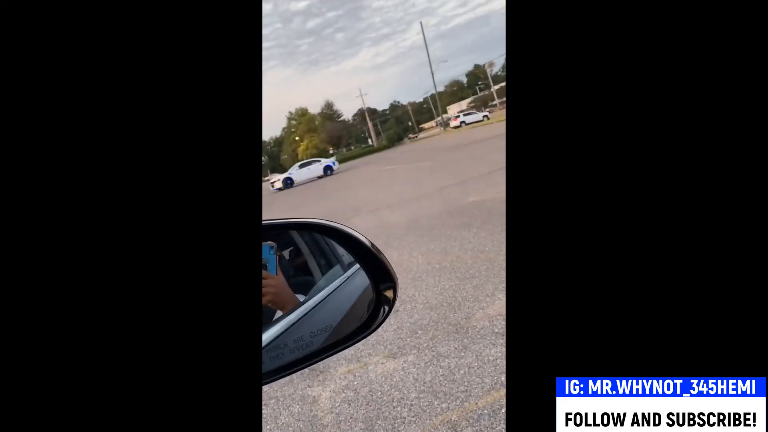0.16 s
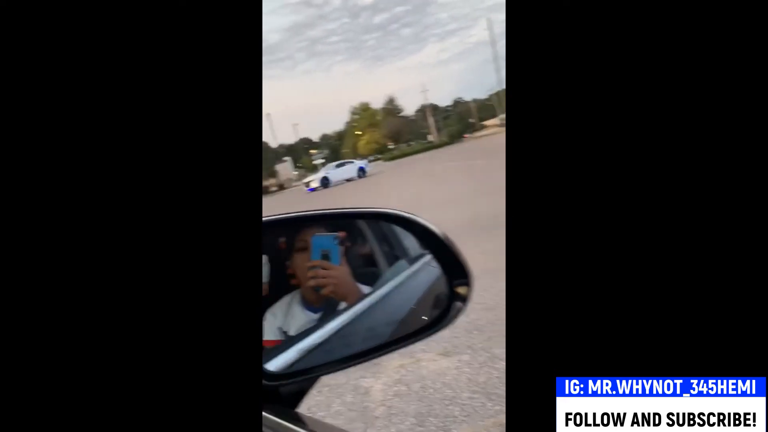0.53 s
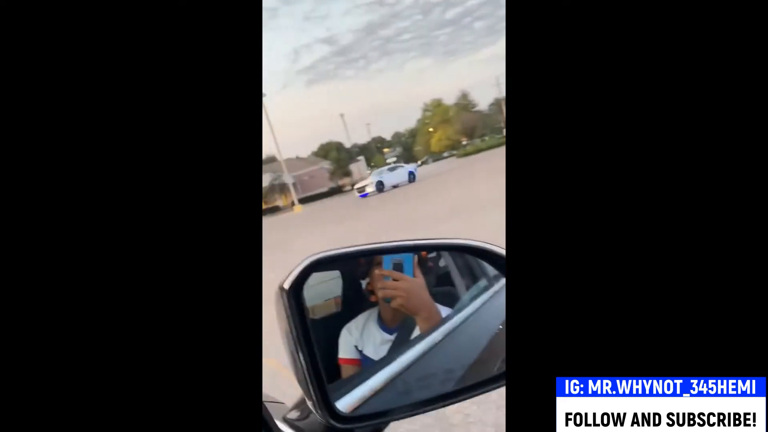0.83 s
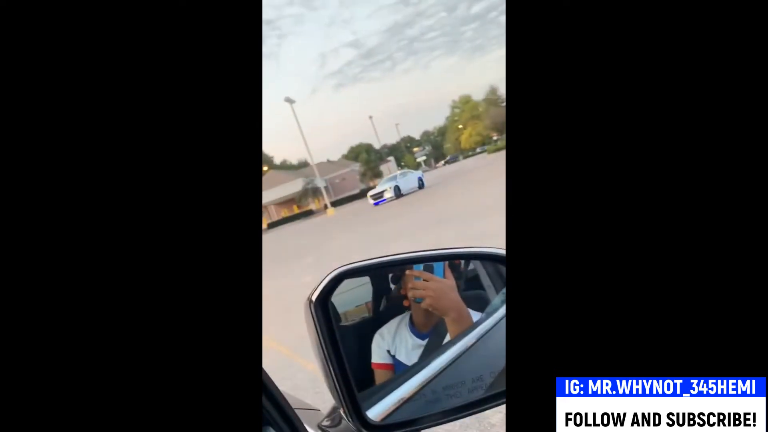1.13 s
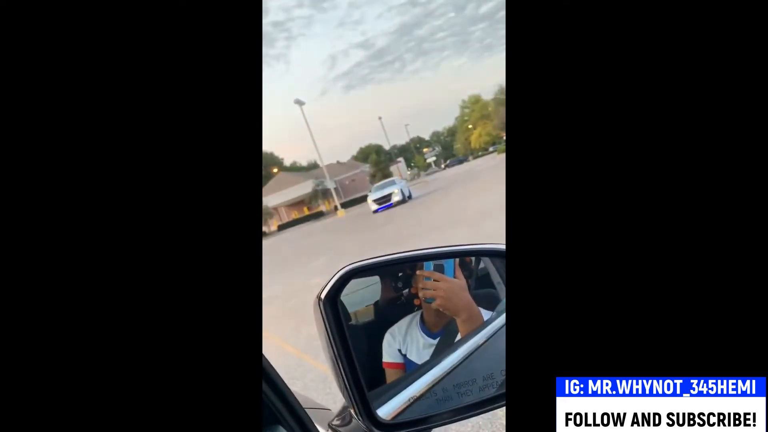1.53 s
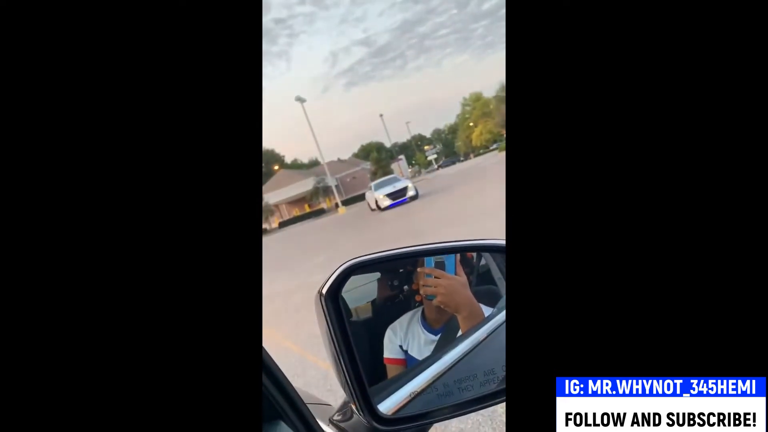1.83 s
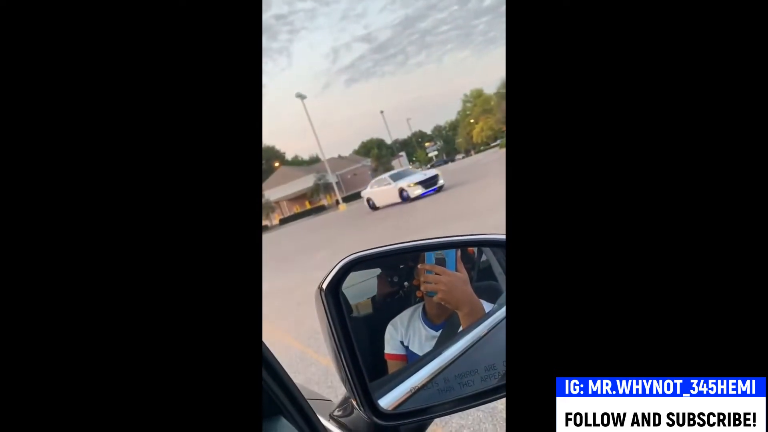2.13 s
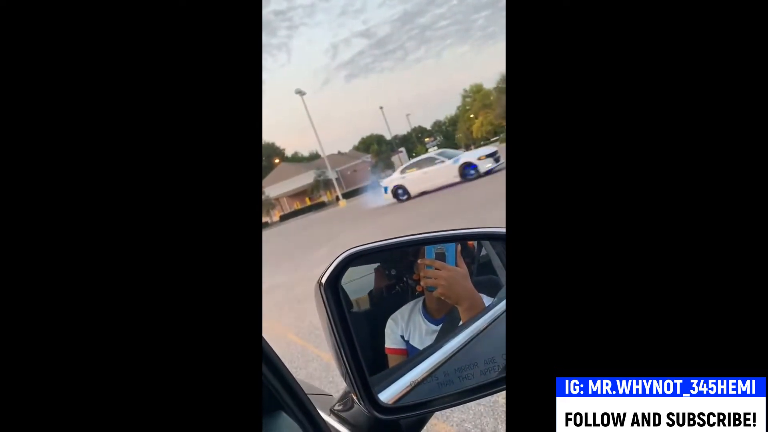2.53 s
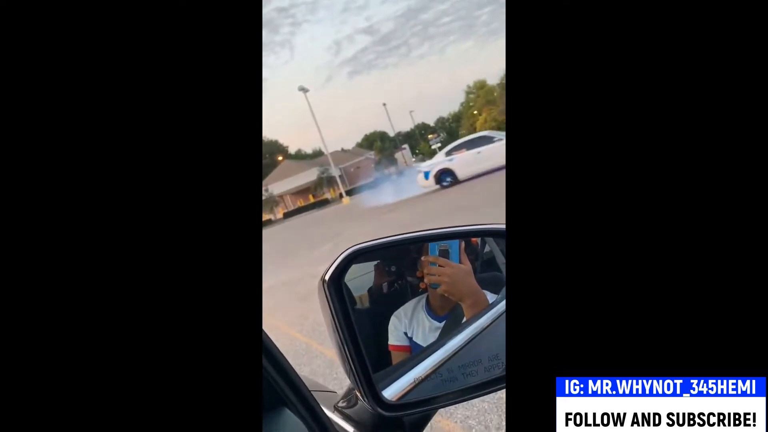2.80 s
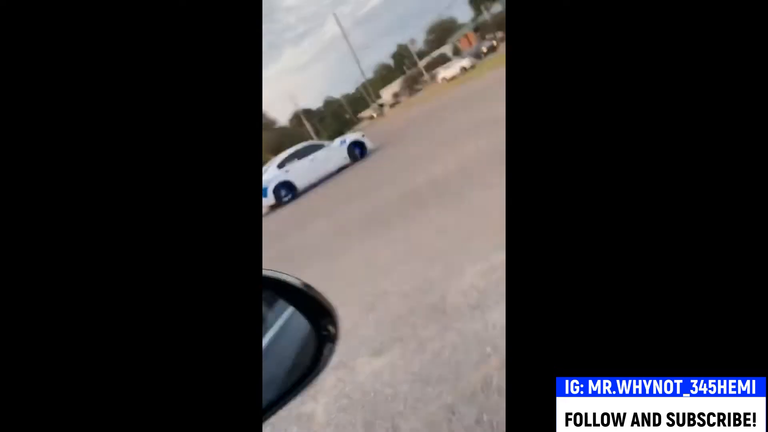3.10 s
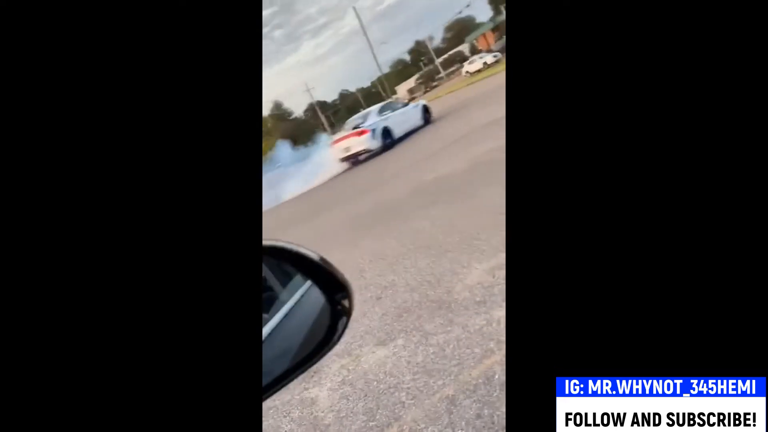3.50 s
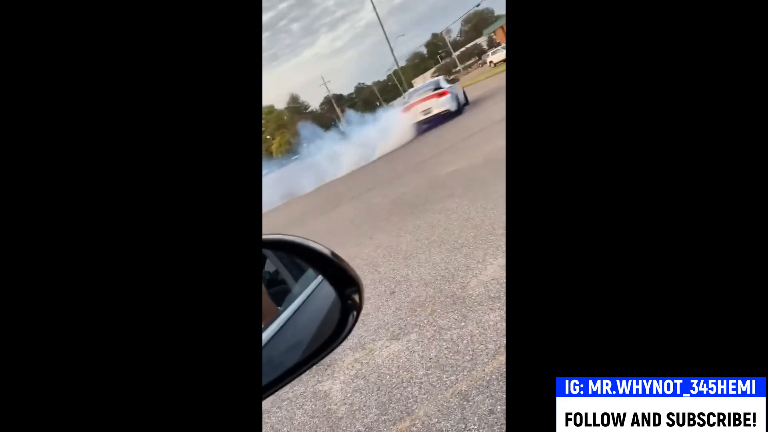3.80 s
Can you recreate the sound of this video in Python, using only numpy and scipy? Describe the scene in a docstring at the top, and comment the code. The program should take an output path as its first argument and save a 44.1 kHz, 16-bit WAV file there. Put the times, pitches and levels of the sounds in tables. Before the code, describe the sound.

A V8 car engine starts low and quiet, swells and winds up to a barking, raspy peak near 1.3 s, sags until 1.7, climbs again to 2.3, bogs by 2.65, then holds a booming, slightly rising roar as it swings close. Short hoarse tyre squeals come from 0.8 to 3.3 s; gritty tyre hiss grows late. Faint high whistle at 0.6, stone tick at 3.7, early low rumble, light open-lot echo.

```python
"""A V8 car spins donuts on an asphalt lot, heard from the window of a standing car.
The engine winds up, bogs twice as the tyres bite, then roughly holds its speed as the car swings close by.
Its lopsided firings make a booming stack of tones, plus bursts of gas noise that roar, bark and rasp.
The tyres squeal as wavering tones and hiss as gritty noise; a whistle, a stone tick and a rumble join in.
The lot answers exhaust and squeals with a fading tail and one far wall."""
import sys
import numpy as np
from scipy import signal
from scipy.fft import rfft, irfft, next_fast_len
from scipy.io import wavfile
from scipy.ndimage import uniform_filter1d, map_coordinates

SR = 44100
rng = np.random.default_rng(int(sys.argv[2]) if len(sys.argv) > 2 else 0)


def output_pcm(signal):
    """Save a mono or channel-first signal as 16-bit PCM at the path in sys.argv[1].

    Samples are clipped to [-1, 1] before scaling.
    """
    pcm = np.clip(np.atleast_2d(signal).T, -1, 1) * 32767
    wavfile.write(sys.argv[1], SR, np.round(pcm).astype(np.int16))


N = 174195  # length [samples]

# Engine speed: (time [s], full four-stroke cycles per second [Hz])
ENGINE_SPEED = [(0, 15.9), (.25, 17.75), (.5, 21.5), (.6, 23.4), (.75, 29.8), (1, 39.3), (1.25, 47.8),
                (1.31, 48.4), (1.42, 47.6), (1.5, 44.8), (1.56, 41.5), (1.62, 37.5), (1.68, 35.2),
                (1.75, 36.8), (1.87, 40.7), (2, 43), (2.25, 47.4), (2.35, 47.4), (2.44, 45.8), (2.5, 43.8),
                (2.57, 39), (2.64, 34.8), (2.75, 34.9), (3, 36), (3.25, 38.1), (3.5, 38), (3.75, 40.4),
                (3.95, 38)]
# Exhaust, before the trims below: (time [s], boom level [dB], bark level [dB], rasp level [dB])
EXHAUST_LEVELS = [(0.0, -35, -49, -49.5), (0.18, -22.5, -35, -39.5), (0.33, -19.5, -28.5, -34),
                  (0.48, -18.5, -22, -24.5), (0.54, -17.5, -20.5, -27.5), (0.58, -17, -19, -22),
                  (0.95, -17.5, -14.5, -16.5), (1.3, -21, -21.5, -19), (1.4, -26.5, -23, -21.5),
                  (1.46, -20.5, -25, -23), (1.56, -19, -18, -17.5), (1.73, -28.5, -26, -24.5),
                  (1.99, -24.5, -27.5, -24), (2.0, -26.5, -58, -27.5), (2.12, -23.5, -28, -24.5),
                  (2.17, -25.5, -28.5, -24.5), (2.38, -21, -20.5, -25.5), (2.44, -15, -19.5, -19),
                  (2.56, -15.5, -25, -19.5), (2.66, -20.5, -21, -23.5), (2.96, -18.5, -18, -17.5),
                  (3.0, -16.5, -17, -20), (3.37, -16, -18, -20.5), (3.73, -18, -20.5, -25.5),
                  (3.95, -23.5, -32, -29)]
# How much gas noise the exhaust carries: (time [s], share [0-1])
ROUGHNESS = [(0, 0.27), (.3, 0.33), (.55, 0.2), (.8, 0.19), (1.1, 0.15), (1.35, 0.26), (1.52, 0.47),
             (1.65, .08), (2.33, 0.18), (2.47, 0.26), (2.58, .14), (2.7, 0.07), (3.95, 0.03)]
# The firings of one cycle: (strength [dB], lag along its header pipe [s])
CYLINDERS = [(-4, 0.00035), (-3.5, 0.001107), (1, 0.001614), (-4, 0.00019), (-3, 0.000897), (1.5, 0.001184),
             (-4.5, 0.00015), (-0.5, 0.00138)]
# Engine orders, tones at whole multiples of the cycle, relative to the boom:
# (multiple [-], pulling away [dB], turning [dB], bogging [dB], passing [dB])
ENGINE_ORDERS = [(2, -16.5, -15.5, -20, -17), (3, -7, -10.5, -10.5, -9), (4, -16, -2, -14.5, -16),
                 (6, -18, -8, -8.5, -11), (7, -15, -15, -8.5, -20), (9, -12.5, -10.5, -13, -9),
                 (10, -13.5, -15, -17.5, -12.5), (11, -15, -12, -13.5, -26), (12, -13, -10.5, -15.5, -23),
                 (13, -21.5, -16, -19, -26), (14, -19.5, -21.5, -21, -15), (15, -19, -12, -14.5, -13.5),
                 (16, -20, -7.5, -19, -19), (17, -19, -18, -18, -9.5), (18, -13, -16, -14.5, -10),
                 (19, -24, -22, -11.5, -12.5), (20, -32, -30, -18, -16), (22, -25, -22, -17, -20),
                 (23, -16, -16, -25, -16)]
# When the order balance reaches each state in turn: time [s]
BALANCE_TIMES = [1.2, 1.42, 1.55, 1.83, 2.2, 2.48, 2.58, 2.75, 3.52, 3.95]
# Fifth order, the drone of the lopsided firing: (time [s], level [dB])
DRONE_LEVEL = [(0, -36), (.3, -29), (.45, -23), (.7, -20), (.85, -19.5), (1.05, -24), (1.25, -22),
               (1.42, -35), (1.52, -30), (1.63, -20.5), (1.75, -27), (1.87, -35), (2.2, -36), (2.35, -24),
               (2.5, -24), (2.65, -18.5), (2.8, -24.5), (3.1, -30), (3.5, -25), (3.95, -31)]
# Eighth order, the firing rate: (time [s], level [dB])
FIRING_TONE_LEVEL = [(0, -47), (.3, -33.5), (.68, -32), (.78, -19), (1, -21.5), (1.12, -29.5),
                     (1.35, -26.5), (1.48, -39), (1.57, -20), (1.68, -30), (1.78, -25.5), (1.95, -38.5),
                     (2.2, -37.5), (2.45, -37), (2.65, -28.5), (2.8, -29), (3.1, -20), (3.35, -21.5),
                     (3.55, -27), (3.7, -38), (3.95, -31)]
# Colours of the three exhaust noises, shape only: (frequency [Hz], gain [dB])
ROAR_COLOUR = [(35, -40), (70, -6), (130, -3), (280, -3), (380, -7), (520, -11), (900, -26), (1500, -74.5)]
BARK_COLOUR = [(250, -54.5), (400, -6.5), (520, -3), (690, 3), (830, 2.5), (980, -1), (1300, -19.5),
               (2500, -61.5)]
RASP_COLOUR = [(550, -38), (900, -2), (1100, 1.5), (1220, 2), (1400, 1.5), (1700, -4.5), (2100, -8),
               (2700, -27), (4500, -50)]
# Tyre squeals: (middle [s], length [s], pitch [Hz], level [dB])
TYRE_SQUEALS = [(0.787, 0.13, 1635, -23.5), (1.302, 0.3, 1454, -21), (1.56, .1, 1081, -20),
                (1.618, 0.27, 1409, -25.5), (2.053, 0.35, 1235, -27.5), (2.28, .2, 1128, -25),
                (2.55, 0.13, 1581, -18.5), (3.1, 0.57, 1100, -23), (3.28, 0.16, 689, -21)]
# Tyre noise, before the trims below: (time [s], scrub level [dB], hiss level [dB])
TYRE_LEVELS = [(0.0, -54, -64), (0.07, -61.5, -56.5), (0.16, -52.5, -66), (0.63, -37.5, -56),
               (0.68, -35, -50), (1.19, -33.5, -41), (1.46, -40.5, -51), (1.54, -30.5, -36),
               (1.73, -38, -51), (1.83, -37.5, -49), (2.09, -30, -41), (2.38, -36, -41), (2.5, -27, -32),
               (2.72, -33.5, -37), (3.17, -36.5, -39.5), (3.3, -31, -28.5), (3.5, -30.5, -26.5),
               (3.82, -27, -25.5), (3.95, -30, -22)]
# Colours of the tyre noises, shape only: (frequency [Hz], gain [dB])
SCRUB_COLOUR = [(1200, -5), (2200, 7.5), (2800, 3.5), (3500, 1.5), (4400, -12), (5500, -7), (8000, -31)]
HISS_COLOUR = [(2500, -16), (4200, 1), (5500, -0.5), (7000, -0.5), (8500, 1.5), (10000, -1.5), (11200, -6),
               (12000, -31)]
# Thin whistle: (time [s], level [dB])
WHISTLE_LEVEL = [(.28, -78), (.42, -56), (.6, -40.5), (.68, -53), (.76, -87)]
# Low rumble, before its trim: (time [s], level [dB])
RUMBLE_LEVEL = [(0.0, -28), (0.25, -36), (0.45, -30), (0.62, -23), (1.3, -35), (1.84, -33), (1.91, -28),
                (2.19, -36), (2.5, -40), (3.74, -45), (3.95, -40)]
# Colour of the rumble, shape only: (frequency [Hz], gain [dB])
RUMBLE_COLOUR = [(15, -30), (33, -25), (46, -1.5), (60, 0), (90, 2), (200, -72)]
# Echo of the lot: (frequency [Hz], time to fade by 60 dB [s])
LOT_FADE = [(100, 0.88), (1000, 0.55), (8000, 0.069)]
# Between the two microphone ports: (frequency [Hz], phase by which left leads [rad])
PORT_PHASE = [(1700, 0), (2200, 1.5), (3600, 1.57), (4100, 1.5), (4500, 3.5), (4900, 3.5), (5300, 3),
              (5800, 5), (6400, 6.5), (7400, 6.5), (9000, 9.5), (10600, 13)]
# Likeness of the ports, rising towards 1 in the bass: (frequency [Hz], likeness [0-1])
PORT_LIKENESS = [(100, 1), (350, 0.96), (700, .94), (1600, 1), (2100, 0.82), (3500, 0.82), (4500, 1),
                 (5300, 0.98), (5800, 0.63), (7000, 1), (7800, 0.17), (9000, 0.79), (9900, 0.71),
                 (11000, 0.49)]
# Left minus right, fading out in the bass: (frequency [Hz], difference [dB])
PORT_BALANCE = [(100, 0), (500, -1.4), (800, -2.5), (1400, 0), (1900, -1.5), (2400, 0.1)]

# Trims added to the levels [dB]
BOOM_DB, ROAR_DB, BARK_DB, RASP_DB = -0.5, -.5, -3.5, -1
SCRUB_DB, HISS_DB, RUMBLE_DB = 3, 2, -3
# Each firing: random strength [dB], random timing [s], fading time of its puff of gas [s]
SCATTER_DB, JITTER_S, PUFF_S = 2.5, .00008, 0.0027
WASH = .4  # steady gas noise between the firings, relative to the puffs
# The pipe lets the bass of each firing out late: delay [s], pitch below which it acts [Hz]
CHIRP_S, CHIRP_HZ = 0.004987, 697
# The pipe delays low orders more; high orders wander more [rad per order squared]
PIPE_SPREAD, PHASE_WANDER = 0.0402, 0.0016
SQUEAL_WAVER, SQUEAL_SMEAR = .025, 0.0499  # slow and fast unsteadiness [share of the pitch]
WHISTLE_HZ = 9980
TICK_S, TICK_DB, TICK_LIFE_S = 3.682, -5.5, 0.00099  # stone: time [s], level [dB], fading time [s]
LOT_DB, WALL_DB, WALL_S = -15, -22, .13  # tail level [dB], wall level [dB], wall delay [s]
TOP_HZ = 11750  # nothing is kept from here up


def amp(db):
    """Turn decibels into gain."""
    return 10 ** (np.asarray(db) / 20)


def unit(x):
    """Scale to rms 1."""
    return x / np.sqrt(np.mean(x ** 2) + 1e-20)


def steady(x):
    """Hold the running rms, taken over a sixth of a second, at 1."""
    return x / np.sqrt(np.abs(uniform_filter1d(x ** 2, size=SR // 6)) + 1e-12)


def along(points, hz):
    """Read (frequency, value) points on a log frequency axis."""
    f, v = np.transpose(points)
    return np.interp(np.log(hz + 1), np.log(f + 1), v)


def curves(rows):
    """Give one value per sample for each column after the time."""
    times, *columns = np.transpose(rows)
    return [np.interp(np.arange(N) / SR, times, column) for column in columns]


def wobble(rate):
    """Draw a smooth random curve with rate knots a second."""
    return map_coordinates(rng.standard_normal(1024), [np.arange(N) * rate / SR + 2], mode='wrap')


def filtered(x, response):
    """Multiply the spectrum of x by a response of frequency, which may be complex."""
    size = next_fast_len(N + SR // 2)
    spectrum = rfft(x, size) * response(np.fft.rfftfreq(size, 1 / SR))
    return irfft(spectrum, size)[..., :N]


def noise(colour):
    """Make coloured noise of rms 1."""
    return unit(filtered(rng.standard_normal(N), lambda hz: amp(along(colour, hz))))


def exhaust():
    """Boom, roar, bark and rasp all follow the same firings."""
    speed, = curves(ENGINE_SPEED)
    boom_db, bark_db, rasp_db = curves(EXHAUST_LEVELS)
    rough = np.clip(curves(ROUGHNESS)[0], 0, 1)
    cycles = np.cumsum(speed) / SR
    pulses = firings(cycles)
    clean = boom(cycles, boom_db, waver_db=0.7)
    roar = amp(ROAR_DB + boom_db) * np.sqrt(rough) * blast(pulses, ROAR_COLOUR, gas=1.0, wash=0.95)
    bark = amp(BARK_DB + bark_db) * blast(pulses, BARK_COLOUR, gas=.15 + rough, wash=WASH)
    rasp = amp(RASP_DB + rasp_db) * blast(pulses, RASP_COLOUR, gas=.2 + rough, wash=WASH)
    return clean + roar + bark + rasp


def firings(cycles):
    """Each cylinder firing is one pulse; strength and lag follow the firing order."""
    count = len(CYLINDERS)
    k = np.arange(1, int(cycles[-1] * count))
    strength_db, lag = np.array(CYLINDERS)[k % count].T
    chance = rng.standard_normal((2048, 2))[k]
    on_time = np.interp(k / count, cycles, np.arange(N))
    at = on_time + SR * (lag + JITTER_S * chance[:, 0])
    strength = amp(strength_db + SCATTER_DB * chance[:, 1])
    return np.bincount(np.abs(at).astype(int), strength, N)[:N]


def boom(cycles, boom_db, waver_db):
    """Clean engine orders: two leading tones over a stack whose balance shifts as the car turns."""
    t = np.arange(N) / SR
    pattern = np.fft.fft(amp(np.array(CYLINDERS)[:, 0]))
    levels = {5: curves(DRONE_LEVEL)[0], 8: curves(FIRING_TONE_LEVEL)[0]}
    for order, away, turning, bogging, passing in ENGINE_ORDERS:
        course = [away, turning, bogging, turning, turning, bogging, bogging, passing, passing, turning]
        levels[round(order)] = BOOM_DB + boom_db + np.interp(t, BALANCE_TIMES, course)
    tones = 0
    for order, db in levels.items():
        bend = (PIPE_SPREAD + PHASE_WANDER * wobble(60)) * order * order
        phase = np.angle(pattern[order % len(pattern)]) + bend
        level = amp(db + waver_db * np.sqrt(order) * wobble(12))
        tones = tones + level * np.cos(2 * np.pi * order * cycles + phase)
    return np.sqrt(2) * tones  # each tone's rms, not its peak, follows its level


def blast(pulses, colour, gas, wash):
    """Pulses mix with puffs and a wash of gas noise; the pipe draws each firing into a falling chirp."""
    puffs = unit(signal.lfilter([1], [1, -np.exp(-1 / (PUFF_S * SR))], pulses))
    turbulent = steady(pipe((puffs + wash) * rng.standard_normal(N), colour))
    gas = np.clip(gas, 0, 1)
    mix = np.sqrt(1 - gas) * steady(pipe(pulses, colour)) + np.sqrt(gas) * turbulent
    return filtered(mix, lambda hz: np.exp(2j * np.pi * CHIRP_S * CHIRP_HZ * np.expm1(-hz / CHIRP_HZ)))


def pipe(x, colour, size=8192):
    """The pipe colours the sound without ringing ahead of each pulse (minimum phase)."""
    log_gain = np.log(amp(along(colour, np.fft.rfftfreq(size, 1 / SR))))
    cepstrum = irfft(log_gain)
    cepstrum[1:size // 2] *= 2
    cepstrum[size // 2 + 1:] = 0  # folding it forward makes the filter causal
    return signal.fftconvolve(x, irfft(np.exp(rfft(cepstrum))))[:N]


def squeals():
    """The tread sticks and slips in short, hoarse squeals, made as tones of unsteady pitch."""
    t, out = np.arange(N) / SR, 0
    for middle, length, hz, db in TYRE_SQUEALS:
        pitch = hz * (1 + SQUEAL_WAVER * wobble(25) + SQUEAL_SMEAR * wobble(300))
        swell = np.exp(-(2 * (t - middle) / length) ** 2)
        tone = np.sin(2 * np.pi * np.cumsum(pitch) / SR)
        out = out + amp(db + 3.4 * wobble(70)) * swell * tone
    return out


def tyres(grit_db, flutter_db):
    """Rubber scrubs over the asphalt in a gritty, uneven hiss."""
    scrub_db, hiss_db = curves(TYRE_LEVELS)

    def grit():
        """Fast and slower random changes of level."""
        return unit(amp(grit_db * wobble(700) + flutter_db * wobble(21.89)))

    scrub = grit() * amp(SCRUB_DB + scrub_db) * noise(SCRUB_COLOUR)
    hiss = grit() * amp(HISS_DB + hiss_db) * noise(HISS_COLOUR)
    return scrub + hiss


def whistle():
    """A thin, high tone of slightly unsteady pitch sounds as the car pulls away."""
    pitch = WHISTLE_HZ + 25 * wobble(91)
    return amp(curves(WHISTLE_LEVEL)[0]) * np.sin(2 * np.pi * np.cumsum(pitch) / SR)


def stone():
    """One piece of thrown grit ticks nearby: a quickly fading burst of noise."""
    age = np.arange(N) / SR - TICK_S
    fade = (age > 0) * np.exp(-np.abs(age) / TICK_LIFE_S)
    return amp(TICK_DB) * fade * noise(HISS_COLOUR)


def rumble():
    """Low noise of uneven level rumbles around the standing car."""
    return amp(RUMBLE_DB + curves(RUMBLE_LEVEL)[0] + 1.6 * wobble(8.9)) * noise(RUMBLE_COLOUR)


def lot(x):
    """The lot answers with a scattered tail, whose treble dies first, and one far wall."""
    hz, t, z = signal.stft(rng.standard_normal(SR // 2), SR, nperseg=256)
    fade = amp(-60 * t / along(LOT_FADE, hz)[:, None])
    tail = signal.istft(z * fade, SR, nperseg=256)[1]
    # both echoes are thin in the bass
    wall = filtered(x, lambda f: np.exp(-2j * np.pi * f * WALL_S) * f / (f + 400))
    smeared = signal.fftconvolve(x, tail / np.linalg.norm(tail))[:N]
    diffuse = filtered(smeared, lambda f: f / np.hypot(f, 450))
    return amp(LOT_DB) * diffuse + amp(WALL_DB) * wall


def ports(x):
    """Two microphone ports share the bass; higher up, phase, level and scatter from around set them apart."""
    t = np.arange(SR // 4) / SR
    scatter = rng.standard_normal(len(t)) * np.exp(-t / .06)
    stray = signal.fftconvolve(x, scatter / np.linalg.norm(scatter))[:N]
    sign = np.array([[1], [-1]])  # left, right

    def turn(hz):
        """Angle that sets how much stray sound replaces the direct sound."""
        return np.arccos(np.clip(along(PORT_LIKENESS, hz), 0, 1)) / 2 * hz / np.hypot(hz, 150)

    def lean(hz):
        """Gain of each port, half the difference each way."""
        return amp(sign * along(PORT_BALANCE, hz) / 2 * hz / np.hypot(hz, 200))

    direct = filtered(x, lambda hz: np.cos(turn(hz)))
    pair = direct + sign * filtered(stray, lambda hz: np.sin(turn(hz)))
    return filtered(pair, lambda hz: lean(hz) * np.exp(.5j * sign * along(PORT_PHASE, hz)))


def scene():
    """The car, its echo and the other sounds meet at the microphone."""
    car = exhaust() + squeals()
    nearby = tyres(grit_db=2.0, flutter_db=1.97) + whistle() + stone() + rumble()
    return ports(car + lot(car) + nearby)


def record(dry):
    """Peaks are rounded off; nothing is kept above the band limit."""
    held = dry / (1 + np.abs(dry / .95) ** 6) ** (1 / 6)
    return filtered(held, lambda hz: hz < TOP_HZ)


dry = scene()
out = record(dry)
output_pcm(out)
```